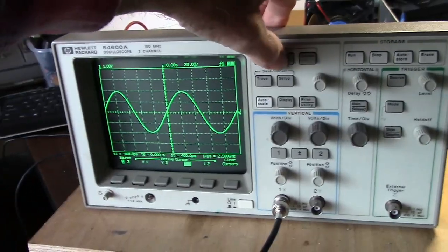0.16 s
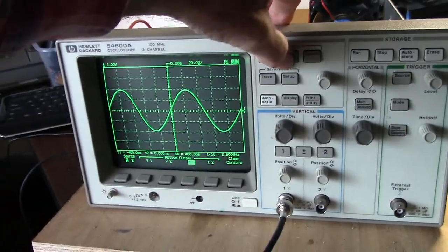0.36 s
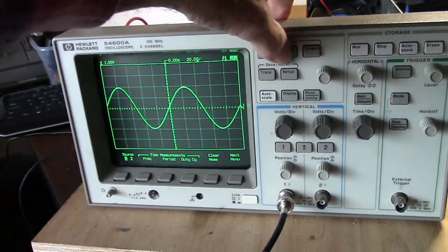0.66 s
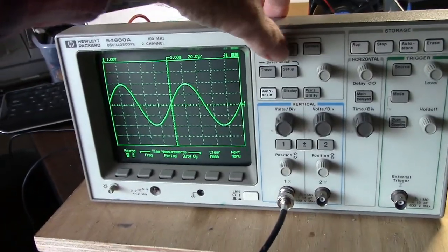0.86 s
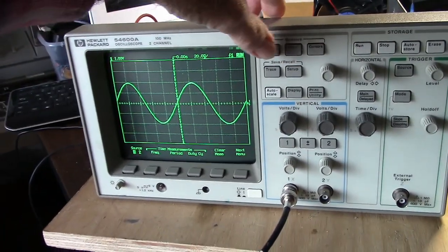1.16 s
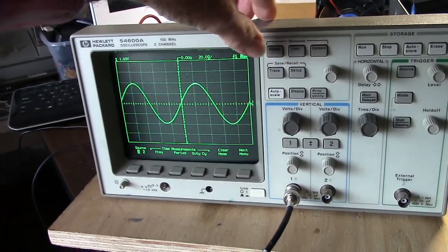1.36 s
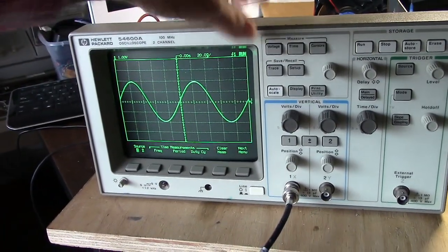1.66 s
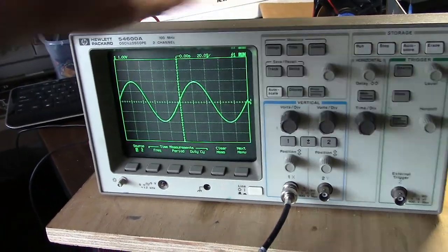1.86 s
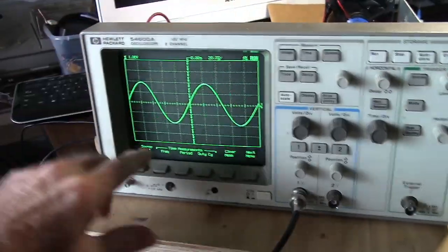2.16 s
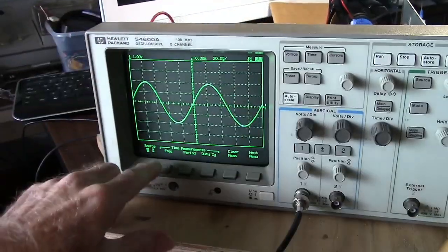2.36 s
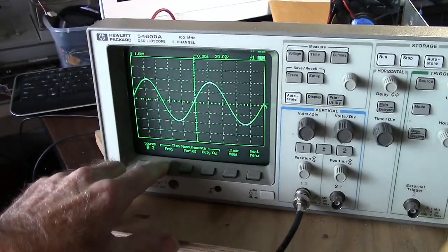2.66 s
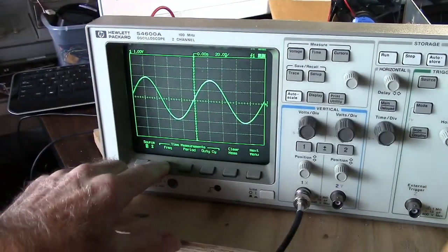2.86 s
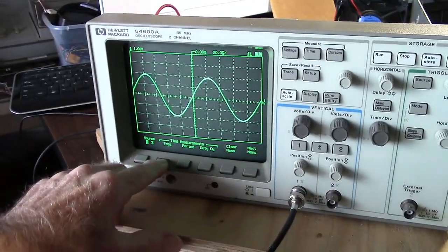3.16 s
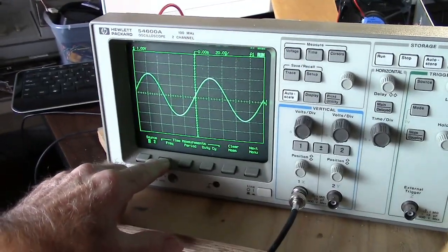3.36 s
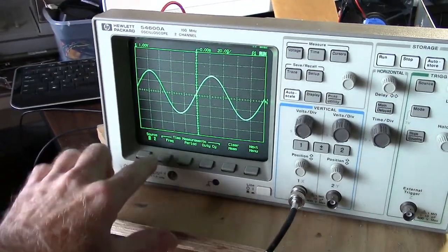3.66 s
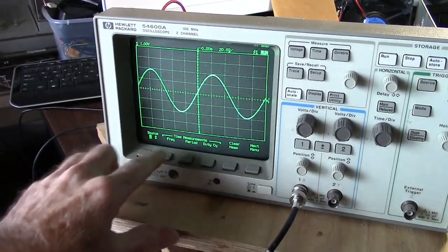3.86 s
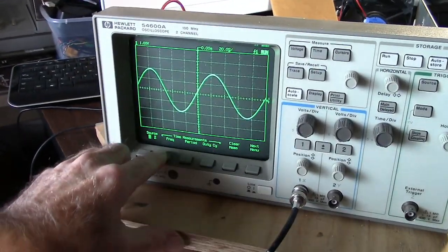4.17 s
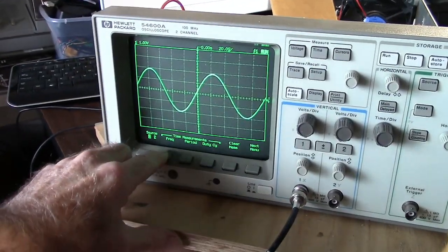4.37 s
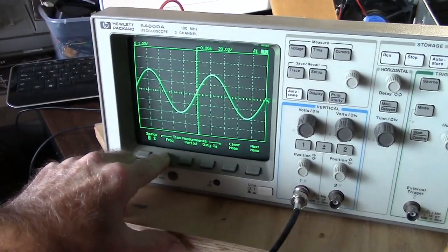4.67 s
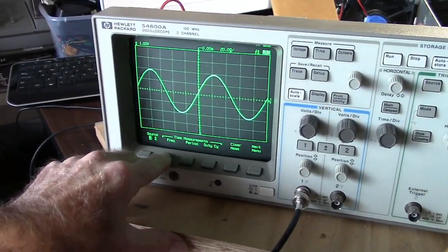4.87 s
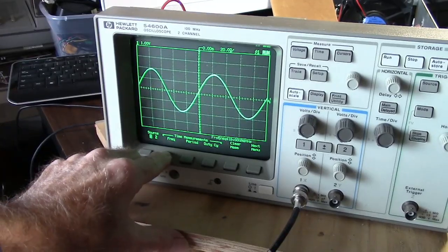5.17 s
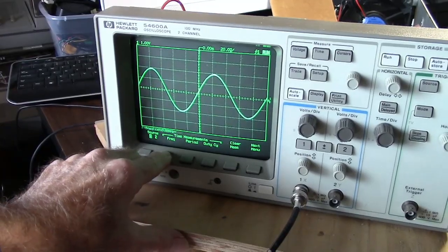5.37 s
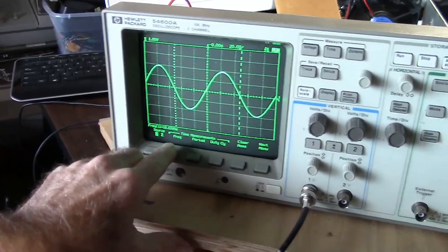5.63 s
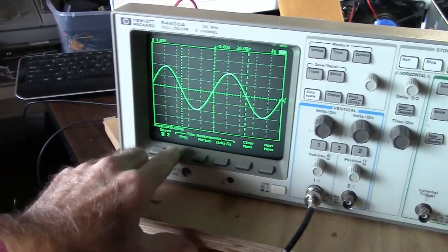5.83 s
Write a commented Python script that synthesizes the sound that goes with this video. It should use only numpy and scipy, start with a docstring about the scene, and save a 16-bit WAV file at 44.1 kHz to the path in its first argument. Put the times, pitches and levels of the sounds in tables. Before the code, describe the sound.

A bench oscilloscope's cooling fan hums quietly in a small workshop, with a very faint, pulsing high whine. A finger ticks on a key, then presses stiff rubber buttons, each press a short thump in the hollow case. Light fingertip scuffs and ticks fall between them. The hardest press comes just past the middle, and near the end a key springs back with a sharp snap. Everything sounds close.

```python
"""Stiff rubber keys of a bench oscilloscope, worked by a finger in a small workshop.
From the start the cooling fan hums and the electronics whine faintly in bursts. At 0.5 s the finger
ticks on a key cap. Presses thump the hollow case at 1.7 and 2.3 s, the second with two faint whistles.
Fingertip scuffs and ticks follow, around a key springing back at 2.8 s and presses at 3.0 and 3.8 s.
At 5.6 s a last key springs back and snaps its hard cap."""
import sys
import numpy as np
from scipy import signal
from scipy.fft import rfft, irfft
from scipy.io import wavfile
from scipy.ndimage import uniform_filter1d

SR = 44100
rng = np.random.default_rng(int(sys.argv[2]) if len(sys.argv) > 2 else 0)


def digitize_waveform(pressure):
    """Quantize a signal to 16-bit integers and store it at the path in sys.argv[1].

    Rows of a 2-D input are taken as channels; values are limited to [-1, 1].
    """
    field = np.atleast_2d(pressure).T
    bounded = np.clip(field, -1, 1)
    quanta = np.round(bounded * 32767).astype(np.int16)
    wavfile.write(sys.argv[1], SR, quanta)


N = 264600
TIME_S = np.arange(N) / SR

# hollow case modes: freq_hz, peak_db, t60_s
CASE_MODES = [(219, -8, 0.12), (307, -8, 0.28), (420, -13.5, 0.024), (528, 4, 0.12), (601.4, -2.5, 0.095),
              (714, -9.5, 0.066), (936, -10, 0.065), (1990, -32, 0.028), (2675, -24, 0.018),
              (3705, -25.5, 0.021)]


def amp(db):
    """Decibels to gain."""
    return 10 ** (np.asarray(db) / 20)


def unit(x):
    """Scale to rms 1."""
    return x / np.sqrt(np.mean(x ** 2) + 1e-20)


def lookup(curve, hz):
    """Interpolate a curve over log frequency."""
    knots_hz, values = np.transpose(curve)
    return np.interp(np.log(hz + 1), np.log(knots_hz + 1), values)


def colour(x, curve):
    """Filter by a curve of freq_hz, gain_db."""
    gain_db = lookup(curve, np.fft.rfftfreq(len(x), 1 / SR))
    return irfft(rfft(x) * amp(gain_db), len(x))


def soften(x, hz, order):
    """Butterworth low-pass."""
    return signal.lfilter(*signal.butter(order, min(hz, .45 * SR), fs=SR), x)


def drift(hz):
    """Random motion up to about hz, rms 1."""
    freq_hz = np.fft.rfftfreq(N, 1 / SR)
    return unit(irfft(rfft(rng.standard_normal(N)) / (1 + (freq_hz / hz) ** 4), N))


def add(mix, start_s, sound):
    """Mix a sound in at start_s."""
    part = mix[max(round(start_s * SR), 0):][:len(sound)]
    part += sound[:len(part)]


def room_tail(build_s=.005):
    """Dense reflections of a small cluttered room; each band dies at its own rate."""
    # decay: freq_hz, t60_s
    decay_times = [(150, 0.094), (500, 0.27), (1200, 0.15), (3000, 0.15), (7000, 0.17), (14000, 0.075)]
    # tail spectrum: freq_hz, level_db
    spectrum = [(150, 3), (500, -13.5), (1200, -2), (2000, -6.5), (3200, -5), (6000, -9), (8500, -20),
                (14000, -13)]
    hz, t, bands = signal.stft(rng.choice([-1., 1.], SR // 2), SR, nperseg=256)
    t60_s = lookup(decay_times, hz)[:, None]
    decay = np.exp(-np.log(1000) * t / t60_s)
    energy_norm = np.sqrt(2 * np.log(1000) / (t60_s * SR))
    gain = amp(lookup(spectrum, hz))[:, None]
    taps = signal.istft(bands * decay * energy_norm * gain, SR, nperseg=256)[1]
    onset = 1 - np.exp(-(TIME_S[:len(taps)] / build_s) ** 2)
    return taps * onset


def room(x, echo_cut_hz=4500, side_db=-15):
    """Direct sound, dulled echoes and a slightly wide tail."""
    # echoes off the bench and nearby gear: delay_s, gain_db
    echoes = [(.0028, -15), (.0070, -16), (0.01, -21), (0.0143, -37), (.0240, -26.5)]
    mid = x + signal.oaconvolve(x, room_tail())[:N]
    dulled = soften(x, echo_cut_hz, order=1)
    for delay_s, gain_db in echoes:
        add(mid, delay_s, amp(gain_db) * dulled)
    side = amp(side_db) * signal.oaconvolve(x, room_tail())[:N]
    return mid + np.array([side, -side])


def fan_air(level_db=-56, swell_db=0.65, gust_cut_hz=700):
    """Rush of the fan's air, nearly mono: lumpy lows, steady hiss."""
    # air and room noise: freq_hz, relative_density_db
    spectrum = [(20, -16), (45, -14.5), (75, -4.5), (115, 4.5), (160, -0.5), (300, 2.5), (370, -1.5),
                (470, 4), (620, -2), (1050, -4.5), (1400, -9), (2100, -9), (2420, -12), (2900, -11.5),
                (3450, -14), (4200, -16.5), (9000, -23.5), (12500, -26), (15500, -34)]
    # stereo width: freq_hz, side_over_mid_db
    width = [(25, -17), (60, -19), (250, -10), (1000, -10), (2500, -10), (8000, -10.5), (14000, -25)]
    mid = unit(colour(rng.standard_normal(N), spectrum))
    side = unit(colour(rng.standard_normal(N), spectrum))
    side = colour(side, width)
    mid += (amp(swell_db * drift(hz=9.2)) - 1) * soften(mid, gust_cut_hz, order=1)
    return amp(level_db) * (mid + np.array([side, -side]))


def fan_hum(shaft_hz=34.93, blades=7, wander=0.0005, trim_db=0.22, waver_db=1.0, sway_rad=0.28):
    """Tones locked to the shaft; turbulence makes each waver, the low blade tones most."""
    # blade and motor tones: shaft_multiple, level_db
    tones = [(7, -57), (8, -70), (12, -59), (13, -73), (14, -65), (20, -77), (21, -68), (23, -78),
             (24, -69), (28, -66), (32, -77), (33, -79), (35, -72), (36, -66), (37, -64), (38, -75),
             (39, -70), (40, -57), (41, -67), (42, -77), (43, -76), (44, -65), (45, -79), (48, -71),
             (49, -74), (50, -80), (51, -80), (67, -80), (69, -81), (70, -79), (73, -82), (98, -82),
             (102, -83), (138, -86)]
    turns = np.cumsum(shaft_hz * (1 + wander * drift(hz=0.4))) / SR
    gusts = [drift(hz=5.9) for _ in range(8)]
    out = np.zeros(N)
    for k, (multiple, level_db) in enumerate(tones):
        swell = np.roll(gusts[k % len(gusts)], rng.integers(N))
        shift = np.roll(gusts[(k + 1) % len(gusts)], rng.integers(N))
        phase = 2 * np.pi * (multiple * turns + rng.random())
        phase += sway_rad * (1 + blades / multiple) * shift
        out += np.sqrt(2) * amp(trim_db + level_db + waver_db * swell) * np.sin(phase)
    return out


def electronics_whine(pitch_hz=5561, bursts_per_s=7.5, level_db=-74, rest_db=-14):
    """High electrical tone in half-duty bursts, much weaker in between."""
    # runs of bursts: start_s, end_s
    runs = [(0, .07), (.665, 1.01), (1.13, 3.5), (3.93, 4.56), (4.863, 6)]
    on = np.zeros(N)
    for start_s, end_s in runs:
        running = (TIME_S >= start_s) & (TIME_S < end_s)
        on += running * ((TIME_S - start_s) * bursts_per_s % 1 < .5)
    gate = uniform_filter1d(np.maximum(on, amp(rest_db)), size=130)
    return np.sqrt(2) * amp(level_db) * gate * np.sin(2 * np.pi * pitch_hz * TIME_S)


def whistles(arch_hz=120, edge_s=0.0095, fade_db_per_s=130):
    """Two faint whistles, each gliding along a shallow arch as it fades."""
    # thin notes: start_s, length_s, pitch_hz, glide_hz_per_s, level_db
    notes = [(2.282, 0.056, 6560, 7000, -68), (2.336, 0.088, 6180, -500, -62.5)]
    out = np.zeros(N)
    for start_s, length_s, pitch_hz, glide_hz_per_s, level_db in notes:
        t = np.arange(0, length_s, 1 / SR)
        hz = pitch_hz + glide_hz_per_s * (t - length_s / 2) + arch_hz * np.sin(np.pi * t / length_s)
        edges = np.minimum(np.minimum(t, length_s - t) / edge_s, 1)
        envelope = amp(level_db - fade_db_per_s * t) * edges
        add(out, start_s, np.sqrt(2) * envelope * np.sin(2 * np.pi * np.cumsum(hz) / SR))
    return out


def panel_ring(modes, travel_s=0.001308, low_cut_hz=250, size=16384):
    """Response to a blow: bending waves cross the panel, highs first; the box radiates little bass."""
    hz = np.fft.rfftfreq(size, 1 / SR)
    power = 1e-12
    for mode_hz, peak_db, t60_s in modes:
        width_hz = np.log(1000) / np.pi / t60_s
        denominator = (mode_hz ** 2 - hz ** 2) ** 2 + (hz * width_hz) ** 2
        power += (amp(peak_db) * mode_hz * width_hz) ** 2 / denominator
    log_gain = np.log(power / (1 + (low_cut_hz / (hz + 10)) ** 6)) / 2
    mirrored = np.r_[log_gain, log_gain[-2:0:-1]]
    causal_rad = -signal.hilbert(mirrored).imag[:len(hz)]  # minimum phase
    bending_rad = -4 * np.pi * travel_s * np.sqrt(hz * 1000)  # delay is travel_s at 1 kHz
    return irfft(np.exp(log_gain + 1j * (causal_rad + bending_rad)))[:size // 2]


def finger_scuffs(grain_db=2.0):
    """Skin catches and slips in tiny uneven steps that hiss and shake the case."""
    # fingertip strokes: centre_s, length_s, hiss_db, rumble_db, brightness_hz
    strokes = [(2.383, 0.094, -77, -56.5, 3000), (2.995, 0.035, -54, -55, 14000),
               (3.11, 0.091, -60, -55.5, 4000), (3.22, 0.084, -60.5, -61, 6000),
               (3.526, 0.092, -58, -61, 15000), (3.842, 0.036, -50, -48, 15000),
               (3.871, 0.028, -50.5, -40.5, 9000), (3.938, 0.098, -57.5, -43.5, 7000),
               (4.14, 0.073, -54, -54.5, 3000), (4.523, .04, -54.5, -56, 8000),
               (4.665, .07, -64, -63, 10000), (5.48, 0.04, -55.5, -48.5, 4000)]
    # skin friction: freq_hz, relative_density_db
    spectrum = [(100, -22), (300, -17), (1500, 14), (2600, 2), (4200, 1.5), (5600, -3.5), (6300, 3.5),
                (7200, -3), (10000, -1), (13000, -9), (16000, -26)]
    slips = rng.standard_normal(N) * amp(grain_db * drift(hz=370))
    hiss = unit(colour(slips, spectrum))
    rumble = unit(signal.oaconvolve(slips, panel_ring(CASE_MODES))[:N])
    out = np.zeros(N)
    for centre_s, length_s, hiss_db, rumble_db, brightness_hz in strokes:
        envelope = np.exp(-(2 * (TIME_S - centre_s) / length_s) ** 2)
        out += envelope * (amp(hiss_db) * soften(hiss, brightness_hz, order=1) + amp(rumble_db) * rumble)
    return out


def strike(case_db, cap_db, contact_hz, low_cut_hz):
    """A blow rings case and key cap; soft contact cuts the treble, a light touch the bass."""
    # key cap modes: freq_hz, peak_db, t60_s
    cap_modes = [(695, -2.5, 0.026), (906, 0, 0.022), (1090, -11.5, 0.022), (1237, 2, 0.029),
                 (1337, -5, 0.03), (1620, -13, 0.035), (1934, 0, 0.037), (2210, -13.5, 0.033),
                 (2500, -22.5, 0.02), (2790, -12.5, 0.063), (3160, -12.5, 0.014), (4620, -18, 0.0024),
                 (5430, -18, 0.0031), (6300, -15.5, 0.0062), (7140, -19, 0.0046), (8150, -10.5, 0.0074),
                 (9660, -21, 0.0036), (10800, -24, 0.0052), (13000, -30, .003)]
    ringing = amp(case_db) * panel_ring(CASE_MODES) + amp(cap_db) * panel_ring(cap_modes)
    blow = soften(ringing, contact_hz, order=2)
    return blow - soften(blow, low_cut_hz, order=1)


def tick(cap_db, contact_hz):
    """Light, thin touch on a key cap."""
    return strike(case_db=cap_db + 6, cap_db=cap_db, contact_hz=contact_hz, low_cut_hz=2000)


def finger_ticks():
    """Fingertip or nail glances off a key cap."""
    # glancing touches: start_s, strength_db, contact_hz
    touches = [(0.474, -15.5, 12000), (0.4780, -2, 2800), (0.4880, -12, 2600), (2.678, -6.5, 4500),
               (3.551, 1.5, 18000), (3.5621, -3, 18000), (4.5197, -9, 5000)]
    out = np.zeros(N)
    for start_s, strength_db, contact_hz in touches:
        add(out, start_s, tick(strength_db, contact_hz))
    return out


def key_snaps(case_over_cap_db=1.5):
    """A released key slips with a tick, then springs back and snaps its cap."""
    # releases: snap_s, snap_db, contact_hz, tick_lead_s, tick_db
    releases = [(2.8269, 7, 2200, 0.0006, -3), (5.5667, 21.5, 12480, 0.0024, 10)]
    out = np.zeros(N)
    for snap_s, snap_db, contact_hz, tick_lead_s, tick_db in releases:
        add(out, snap_s - tick_lead_s, tick(tick_db, contact_hz=17000))
        add(out, snap_s, strike(snap_db + case_over_cap_db, snap_db, contact_hz, low_cut_hz=530))
    return out


def key_presses(low_cut_hz=185, bottom_lag_s=0.0144, bottom_db=-15.5, bottom_contact_hz=900):
    """A press thumps the case, then the key bottoms out, weaker and duller."""
    # keys pushed home: start_s, force_db, contact_hz
    presses = [(1.6964, 4, 1180), (2.3011, 17.5, 4000), (3.0100, 4.5, 1200), (3.8061, 30, 4400)]
    out = np.zeros(N)
    for start_s, force_db, contact_hz in presses:
        cap_db = -6 + 0.32 * force_db  # rubber cushions the cap
        add(out, start_s, strike(force_db, cap_db, contact_hz, low_cut_hz))
        bottoming = amp(bottom_db) * strike(force_db, cap_db, bottom_contact_hz, low_cut_hz)
        add(out, start_s + bottom_lag_s, bottoming)
    return out


def scene():
    """Finger and keys in the room, over the running instrument."""
    handling = finger_scuffs() + finger_ticks() + key_snaps() + key_presses()
    return room(handling) + fan_air() + fan_hum() + electronics_whine() + whistles()


def record(dry):
    """Steep low-pass at 15.9 kHz."""
    taps = signal.firwin(511, 15900, window=("kaiser", 9), fs=SR)
    return signal.oaconvolve(dry, taps[None], "same", axes=1)


dry = scene()
out = record(dry)
digitize_waveform(out)
```